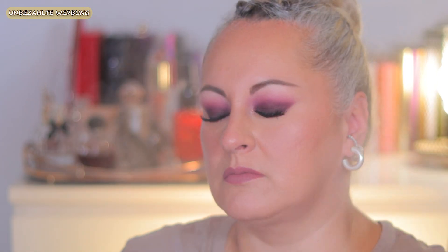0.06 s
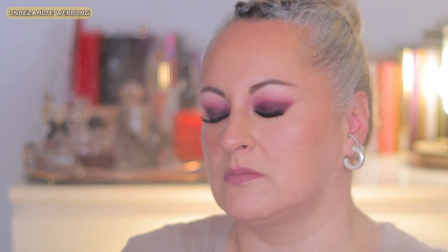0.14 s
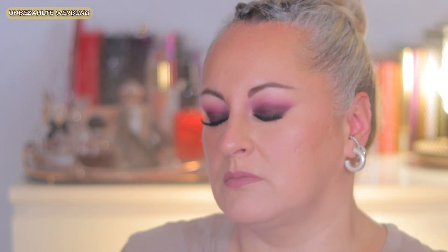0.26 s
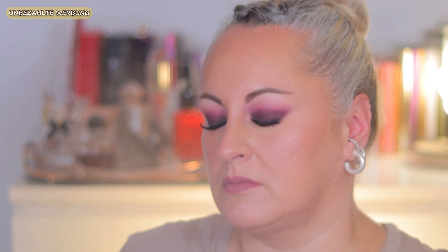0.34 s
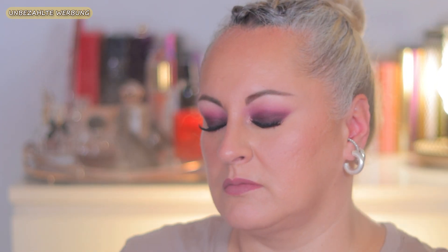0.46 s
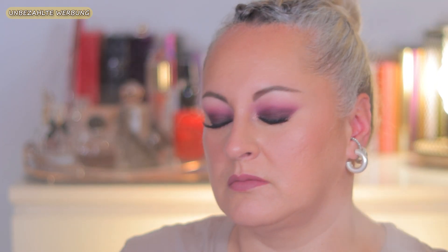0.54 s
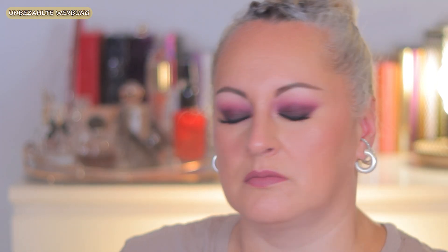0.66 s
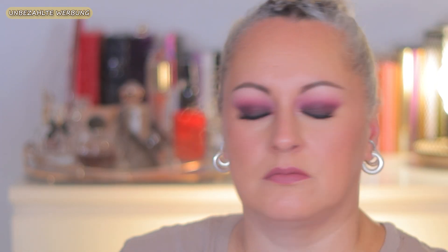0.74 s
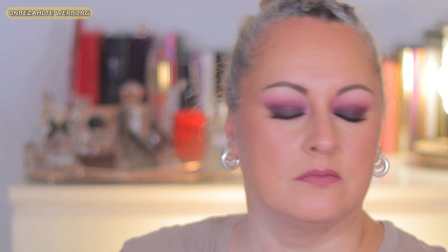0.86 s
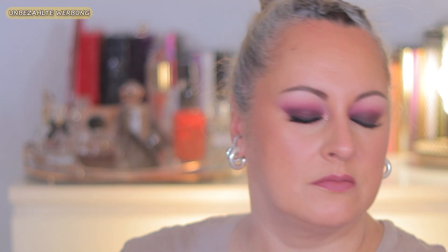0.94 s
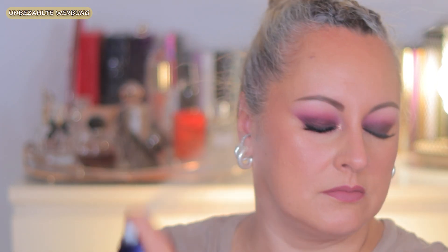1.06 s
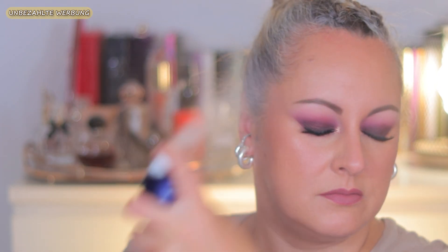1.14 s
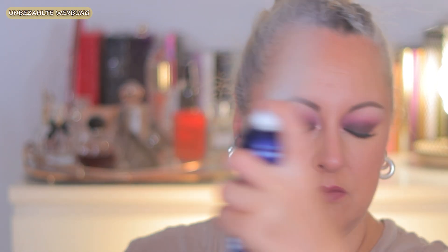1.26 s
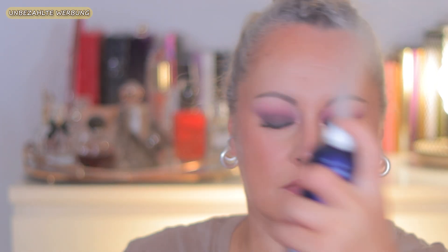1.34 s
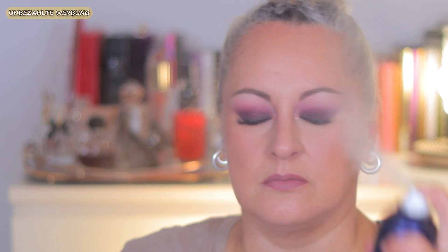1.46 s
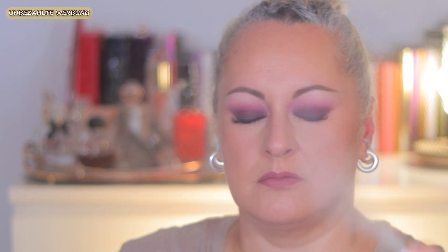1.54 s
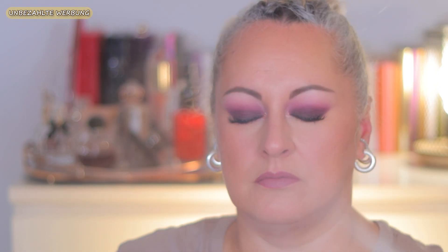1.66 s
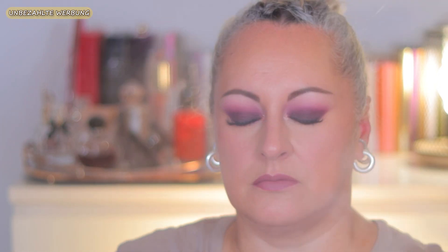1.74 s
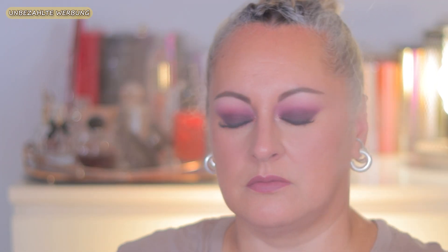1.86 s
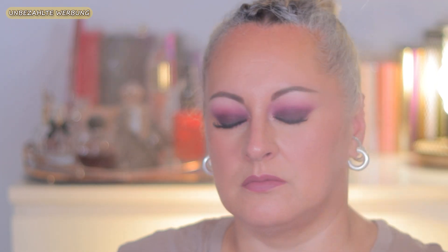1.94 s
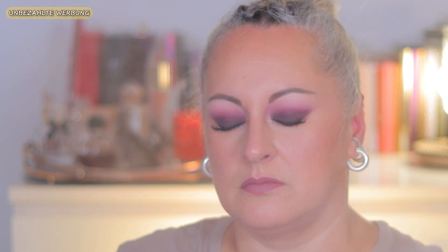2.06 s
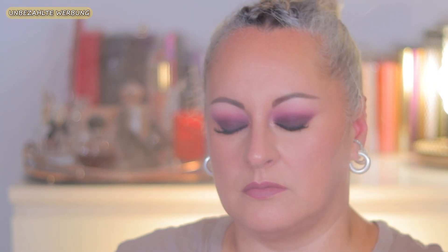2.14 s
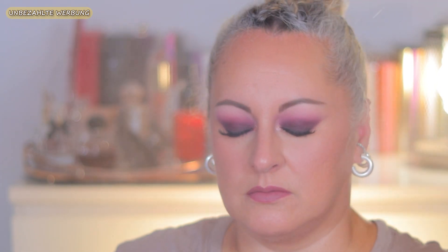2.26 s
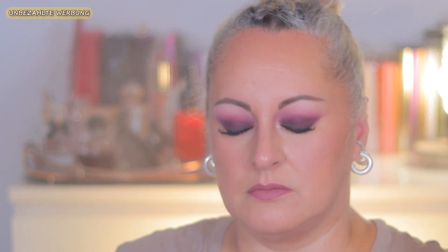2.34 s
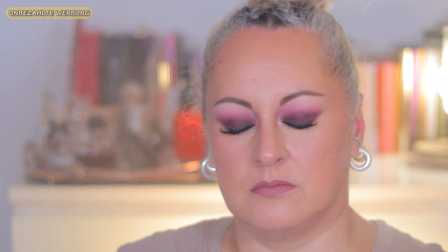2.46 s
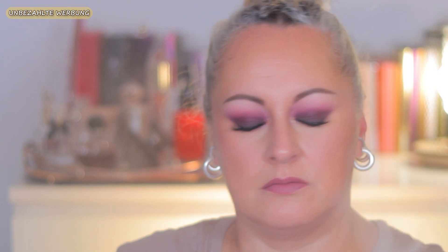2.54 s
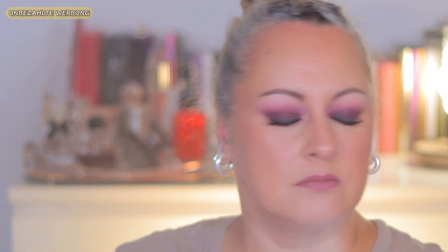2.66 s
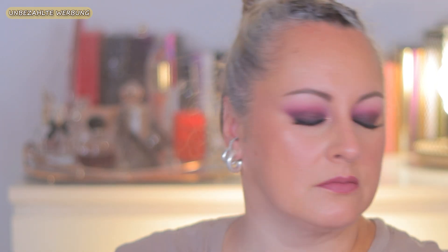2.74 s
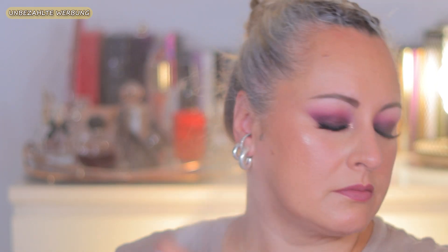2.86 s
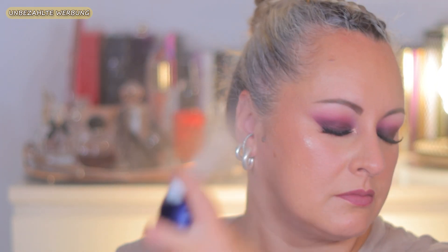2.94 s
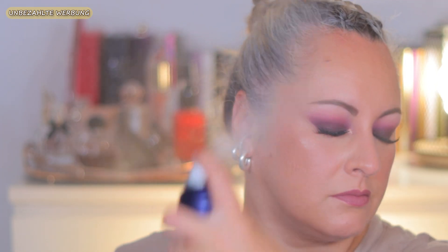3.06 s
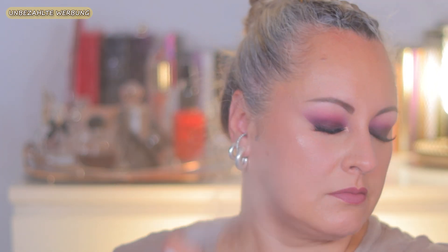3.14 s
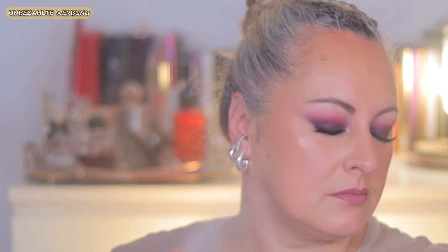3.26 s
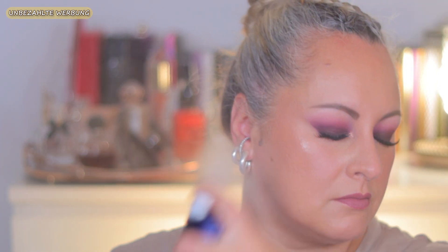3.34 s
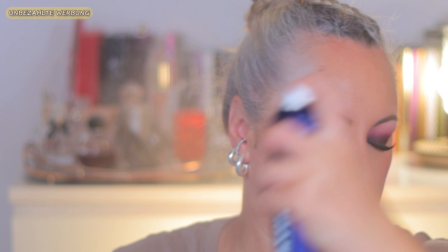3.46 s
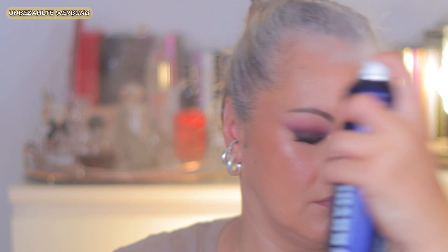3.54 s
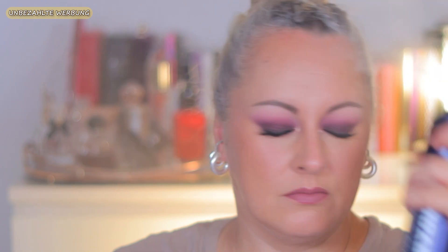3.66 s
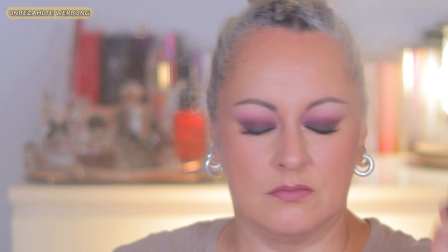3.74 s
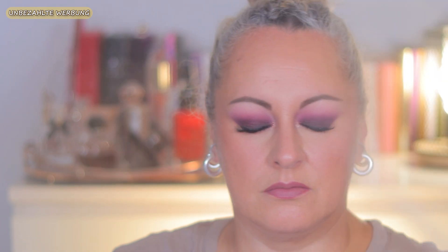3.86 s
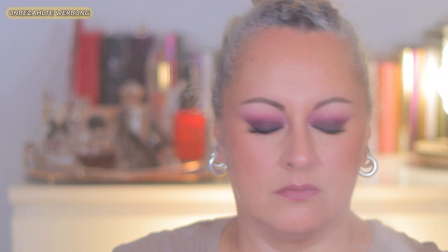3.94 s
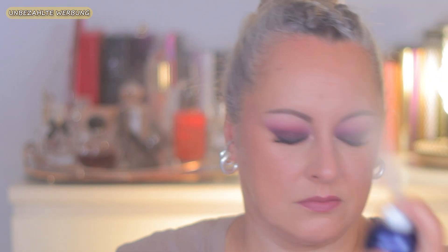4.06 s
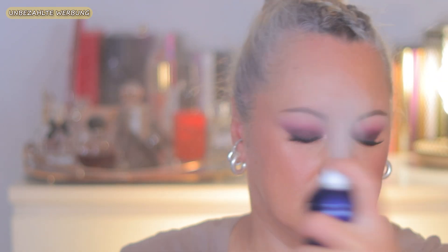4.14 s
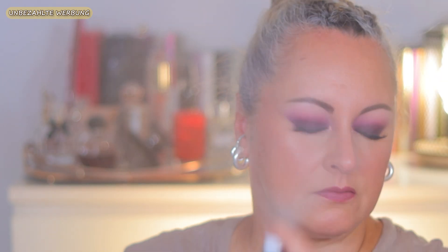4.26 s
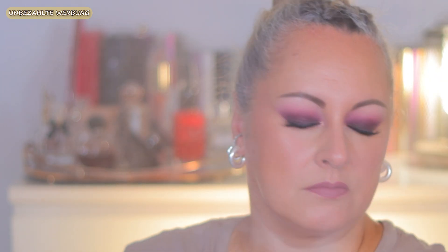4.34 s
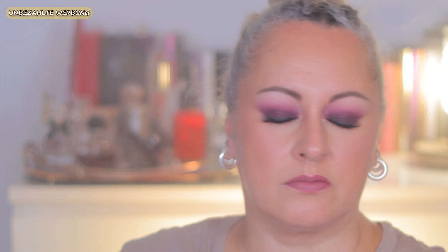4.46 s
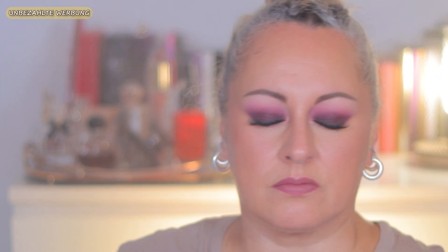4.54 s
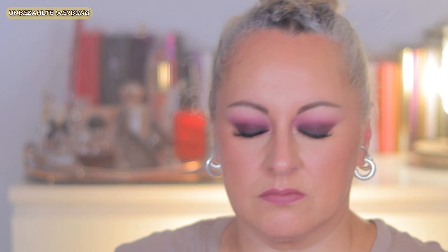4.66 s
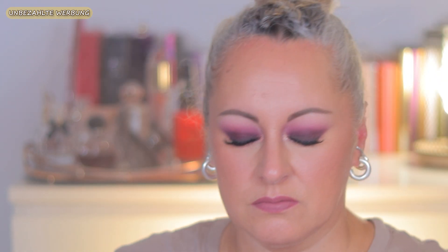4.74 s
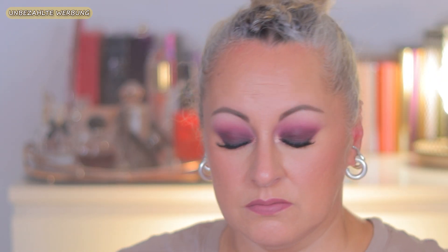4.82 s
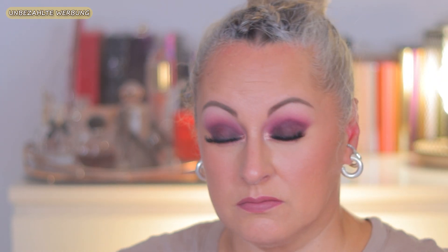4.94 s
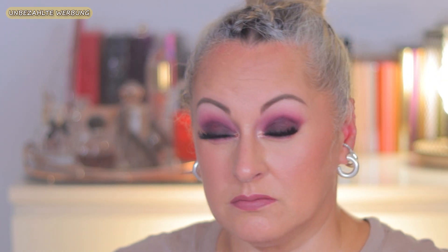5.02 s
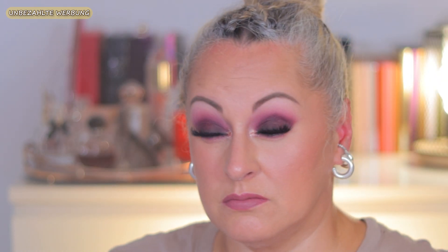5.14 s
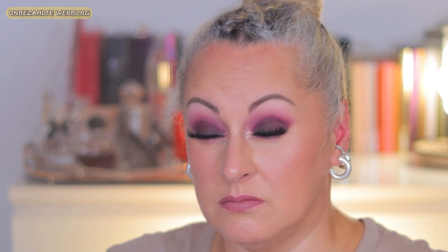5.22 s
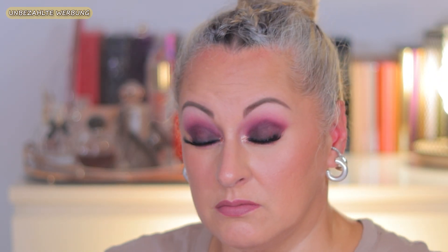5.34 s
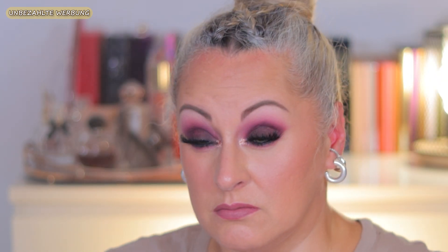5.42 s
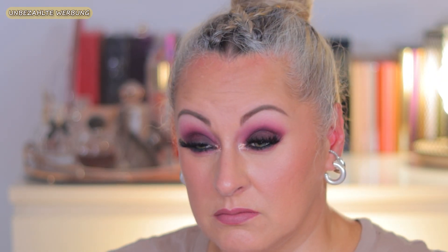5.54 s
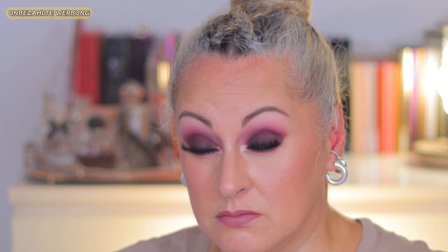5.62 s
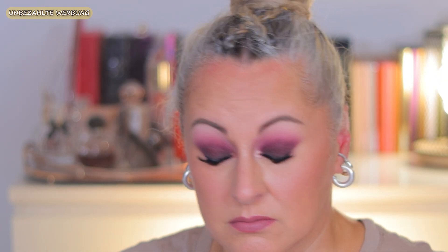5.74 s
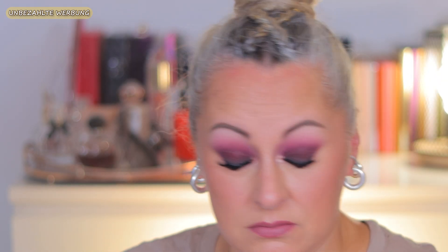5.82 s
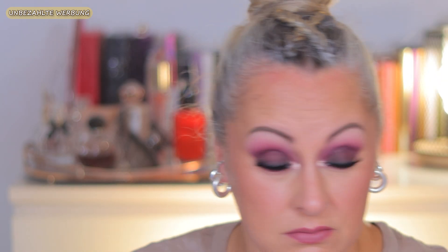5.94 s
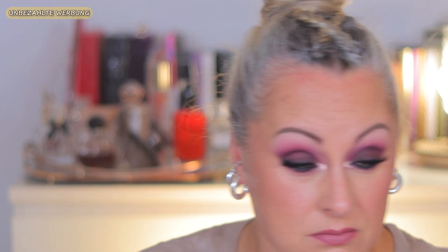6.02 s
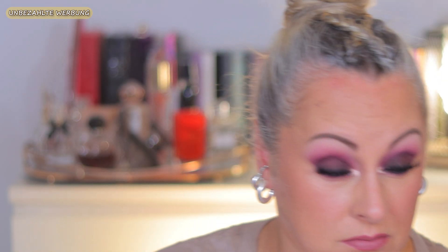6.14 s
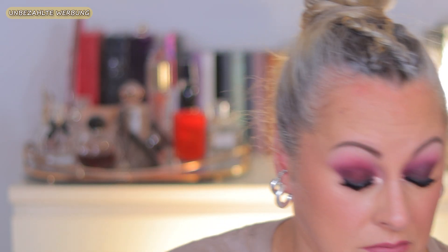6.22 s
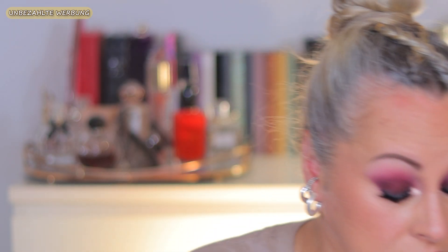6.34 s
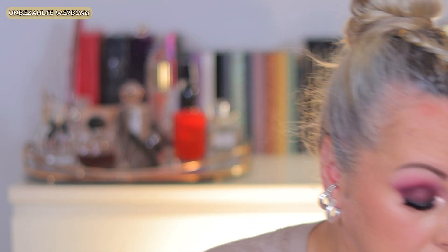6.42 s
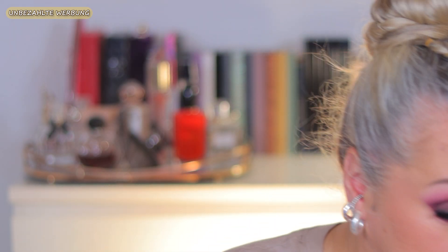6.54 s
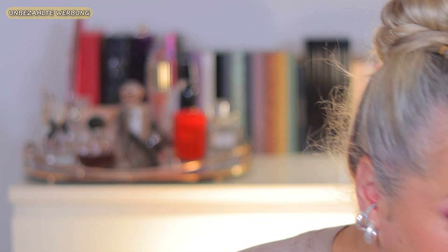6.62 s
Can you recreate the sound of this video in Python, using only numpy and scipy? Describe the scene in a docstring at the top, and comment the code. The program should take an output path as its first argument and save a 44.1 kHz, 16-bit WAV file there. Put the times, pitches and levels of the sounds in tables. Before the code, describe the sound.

A fine mist sprayer hisses continuously for four and a half seconds, swelling as it sweeps past, then a plastic cap snaps on amid air thumps.

```python
"""A spray bottle is swept around a face in a small furnished room, heard by one microphone.
First comes a long hiss of shaped noise that swells as the nozzle passes the microphone, then shuts off.
Next the cap snaps back on: bursts of noise and the ringing of a hollow bottle. Around and after it, fingers
rub the plastic with grainy noise, and near the end a seat creaks as uneven clicks ring wood.
Throughout, stirred air buffets the microphone as deep noise, over a faint mains hum and a quiet hush."""
import sys
import numpy as np
from scipy import signal
from scipy.fft import rfft, irfft
from scipy.io import wavfile
from scipy.ndimage import uniform_filter1d

SR = 44100
rng = np.random.default_rng(int(sys.argv[2]) if len(sys.argv) > 2 else 0)


def waveform_to_disk(signal):
    """Save audio, clipped to [-1, 1], as 16-bit WAV at the path in sys.argv[1]."""
    frames = np.transpose(np.atleast_2d(signal))
    scaled = np.clip(frames, -1, 1) * 32767
    samples = np.round(scaled).astype(np.int16)
    wavfile.write(sys.argv[1], SR, samples)


def undo_db(level):
    """Turn decibels back into plain size, where 20 dB means ten times bigger."""
    steps = np.asarray(level, float) / 20
    return 10 ** steps


N = 294588  # length in samples

# In every spectrum table below, density_db is the relative strength per Hz; only its shape counts.

# sweep of the hand: start_s, level_db, facing_0_to_1 (how squarely the nozzle faces the microphone),
# hump_hz (hump of the fizz), fullness_db (how full the lower jet sounds)
SWEEP = [(0.0, -24.5, 0.16, 8000, -0.5), (0.06, -26.5, 0, 7600, 2.5), (0.29, -24, 0.2, 7750, 1.5),
         (0.45, -26.3, 0.24, 7800, -0.5), (0.58, -26.5, 0.2, 7300, -1.5), (0.7, -24.5, .4, 7500, 2),
         (0.79, -21.5, 1, 7800, 0.5), (0.9, -22.5, 0.7, 7800, -2.5), (1.02, -24.5, 0.6, 7570, -3),
         (1.28, -26, 0.44, 7200, -0.5), (1.58, -25.5, 0.5, 7250, 1), (1.72, -23, .3, 7400, 0.8),
         (1.81, -24, 0.4, 7550, 3), (1.94, -25.5, 0.15, 7900, 0.5), (2.12, -26, 0.26, 7700, 1),
         (2.27, -26, 0.35, 8200, -1), (2.46, -26.5, 0.3, 7650, -4), (2.6, -25.5, .4, 7400, 0.7),
         (2.77, -22.5, .7, 8700, 0.5), (2.86, -23.5, 0.4, 7400, -1.5), (3.04, -26, 0.24, 7000, 1),
         (3.25, -26, 0.35, 7350, -0.3), (3.44, -25.5, 0.67, 7000, -1.4), (3.64, -26.5, .2, 7200, 0.2),
         (3.86, -27.5, 0.2, 7900, 0.3), (4.02, -24.5, 0.4, 7800, 0.5), (4.26, -23, 0.04, 7200, 1.5),
         (4.4, -26, 0.5, 6860, -1.7), (4.52, -22.5, .4, 7650, -0.5)]
# spectrum of the broad fizz: pitch_hz, density_db
FIZZ_SPECTRUM = [(2800, -33), (3700, -13), (4000, -7), (5000, -4.5), (6900, 0.5), (9000, -2), (11200, -1),
                 (14000, -6.5), (16000, -13)]
# spectrum of the lower roar of the jet: pitch_hz, density_db
ROAR_SPECTRUM = [(500, -9), (750, -2.5), (880, -3.5), (1200, 1.5), (1380, -4), (1620, 5.5), (1830, -5.5),
                 (2000, -29)]
# narrow parts of the jet: start_pitch_hz, width_hz, start_level_db (against the fizz), sag_db_per_s,
# climb_share (share of the nozzle tone's climb)
NOZZLE_TONES = [(2480, 170, -15.5, -1.04, 1.0), (2090, 140, -19, -2.2, 0.15), (3350, 400, -18, -2.4, 0.3)]
# mist strikes the face with a low puff: peak_s, level_db (against the fizz), half_width_s
FACE_PUFFS = [(0.28, -36, 0.07), (0.76, -39, 0.076), (1.81, -42.5, 0.079), (2.76, -32, 0.064),
              (3.03, -36.5, .05), (4.27, -40, 0.19)]
# knocks on the plastic: start_s, tick_db, wall_db, upper_modes_db, lower_modes_db
PLASTIC_KNOCKS = [(4.607, -37, -54, -73, -58), (4.984, -26, -33, -24.5, -26),
                  (4.9923, -10.5, -18.5, -20.5, -15.5), (4.9973, -24, -20, -18, -28),
                  (5.0044, -25, -12, -21, -36), (5.0088, -17, -21, -42, -19.5),
                  (5.0202, -34, -23, -37, -37), (5.0269, -35, -19, -32, -25),
                  (5.2094, -18.5, -41.5, -48, -39.5), (5.2099, -38, -39, -50, -48),
                  (5.2172, -33, -37, -55, -59), (5.2214, -34, -29, -46, -40), (5.233, -38, -36, -46, -40),
                  (5.4594, -25.5, -56, -60, -50), (5.4617, -31, -52, -51, -41),
                  (5.4728, -32, -54, -46, -41), (5.648, -46, -54, -63, -65), (5.808, -48, -52, -70, -62),
                  (6.1944, -55, -60, -48, -49)]
# spectrum of the cap's bright crack: pitch_hz, density_db
CRACK_SPECTRUM = [(2500, -10.5), (3900, -16), (4900, -4), (6500, -2), (7100, 1), (7500, -1), (7900, -5),
                  (8500, -5), (10500, -18), (13200, -20), (16000, -36)]
# spectrum of the wall's clack: pitch_hz, density_db
CLACK_SPECTRUM = [(700, -5), (1200, 0), (1550, 3), (1900, 1), (2400, 1), (3000, -2.5), (3800, -6),
                  (5500, -18.5)]
# ringing modes of the hollow bottle: pitch_hz, level_db (against the knock), t60_s (time to fall 60 dB)
BOTTLE_MODES = [(290, -12, .08), (330, -6, .09), (385, 0, .07), (480, -2, .09), (557, -4, .06),
                (800, -3, .08), (928, 3, .085), (1090, -2, .065)]
# fingers slide on the plastic: start_s, length_s, level_db, dull_db (dull part against the bright)
FINGER_SLIDES = [(4.797, 0.091, -66, -10), (5.117, 0.12, -63, 2), (5.416, 0.067, -55, -4),
                 (5.454, 0.056, -39.5, 0), (5.636, .09, -61, -2), (5.786, 0.051, -63, 4),
                 (5.858, 0.099, -63, -15), (6.152, 0.05, -66, 4), (6.31, .04, -68, 5),
                 (6.568, 0.035, -65, 2)]
# spectrum of the bright rustle: pitch_hz, density_db
RUSTLE_SPECTRUM = [(2060, -20), (3500, -7), (4280, -5.5), (5460, -4), (5910, -5), (6800, 0), (15000, -34)]
# spectrum of the duller rub: pitch_hz, density_db
DULL_SPECTRUM = [(180, -12), (300, 4.5), (420, -12), (700, -12), (1700, -21), (2300, -9), (2600, -5),
                 (2900, -12), (3600, -19), (4700, -40)]
# the seat gives: start_s, length_s, level_db, first_pitch_hz, last_pitch_hz
SEAT_CREAKS = [(6.188, .055, -44, 560, 740), (6.24, .08, -49, 790, 800), (6.31, .055, -50, 800, 900),
               (6.575, .06, -59, 570, 400)]
# stirred air reaches the microphone: peak_s, level_db, half_width_s
AIR_GUSTS = [(0.0, -30, 0.047), (0.15, -26.5, 0.021), (0.37, -34, 0.064), (0.54, -28.5, 0.024),
             (0.69, -23, 0.039), (0.96, -21, 0.077), (1.15, -21.5, 0.038), (1.3, -37, 0.066),
             (1.97, -33, 0.05), (2.15, -13.5, 0.034), (2.42, -27.5, 0.12), (3.0, -29, 0.062),
             (3.23, -16.5, 0.061), (3.36, -23.5, 0.041), (3.73, -39.5, 0.087), (4.08, -20, 0.038),
             (4.22, -30, 0.019), (4.72, -22, 0.033), (4.94, -25.5, .06), (5.26, -33, 0.077),
             (5.4, -28, 0.029), (5.53, -37, 0.083), (5.9, -23.5, 0.071), (6.22, -32, 0.051),
             (6.4, -27, 0.065), (6.63, -35, 0.075)]
# spectrum of the stirred air: pitch_hz, density_db
GUST_SPECTRUM = [(3, 0.5), (6, 7), (20, -2), (31, -29), (60, -38.5), (110, -44.5), (200, -86)]
# mains hum: pitch_hz, rms_db
MAINS_HUM = [(99.6, -75.5), (199.2, -68.5)]
# spectrum of the room hush: pitch_hz, density_db
HUSH_SPECTRUM = [(20, 1.5), (40, 7), (60, 2), (110, -3), (160, -8.5), (250, -7), (600, -11.5), (1100, -17),
                 (1500, -19.5), (3000, -24), (11800, -27.5), (12300, -22), (16000, -23)]
# how fast the room's reflections die: pitch_hz, t60_s (time to fall 60 dB)
ROOM_DECAY = [(250, 0.28), (660, 0.18), (1740, 0.23), (4590, 0.21), (12100, 0.18)]


def evened(x):
    """Scales to rms 1."""
    return x / np.sqrt(np.mean(x ** 2) + 1e-20)


def read(points, hz):
    """Reads a table of values between its points, on a log-frequency axis."""
    f, value = np.transpose(points)
    return np.interp(np.log(hz + 1), np.log(f + 1), value)


def coloured(points, size=N):
    """Steady noise of a given spectrum, rms 1."""
    hz = np.fft.rfftfreq(size, 1 / SR)
    white = rfft(rng.standard_normal(size))
    return evened(irfft(white * undo_db(read(points, hz)), size))


def resonate(x, hz, width_hz):
    """A resonance of gain 1 that follows the curve hz: shift down to zero, smooth, shift back up."""
    turn = np.exp(2j * np.pi * np.cumsum(hz * np.ones(len(x))) / SR)
    r = np.exp(-np.pi * width_hz / SR)
    return 2 * (turn * signal.lfilter([1 - r], [1, -r], x / turn)).real


def wander(t, per_s, count):
    """Slow random drifts, rms 1: sums of slow sines, the slower the stronger."""
    rate = np.geomspace(per_s / 10, per_s, 20)[:, None]
    phase = rng.random((count, 20, 1))
    return evened((np.sin(2 * np.pi * (rate * t + phase)) / np.sqrt(rate)).sum(1))


def rub(t, start, length):
    """Progress 0-1 through a rub, and its swell: up to an early peak, down again."""
    peak_at, skirt_db = 0.37, -16.5  # peak as a share of the length; level at both ends
    u = (t - start) / length
    away = np.maximum((peak_at - u) / peak_at, (u - peak_at) / (1 - peak_at))
    return np.clip(u, 0, 1), undo_db(np.maximum(skirt_db * away ** 2, -200))


def bumps(rows, t):
    """Sum of bell-shaped swells."""
    return sum(undo_db(db) * np.exp(-.5 * ((t - s) / half) ** 2) for s, db, half in rows)


def background():
    """Slow air pressure on the microphone as deep noise, room hush as steady noise, mains hum as sines."""
    calm_db, hush_db = -47.5, -55
    t = np.arange(N) / SR
    air = coloured(GUST_SPECTRUM)
    # level out chance swells, so that the strength of a gust is set by its row alone
    air = evened(air / np.sqrt(uniform_filter1d(air ** 2, 5000) + 0.22))
    strength = undo_db(calm_db) + bumps(AIR_GUSTS, t)
    hum = sum(np.sqrt(2) * undo_db(db) * np.sin(2 * np.pi * (hz * t + rng.random())) for hz, db in MAINS_HUM)
    return strength * air + hum + undo_db(hush_db) * coloured(HUSH_SPECTRUM)


def creaks(slips_per_s=390.0):
    """Uneven stick-slip clicks ring a wooden resonance that drifts, and a fixed one above it."""
    t, out = np.arange(N) / SR, np.zeros(N)
    slips = (rng.random(N) < slips_per_s / SR) * rng.choice([-1., 1.], N)
    upper = evened(resonate(resonate(slips, 880, 150), 910, 250))
    for s, length, db, from_hz, to_hz in SEAT_CREAKS:
        progress, swell = rub(t, s, length)
        hz = from_hz + (to_hz - from_hz) * progress
        drifting = evened(resonate(resonate(slips, hz, 98), hz, 200))
        out += undo_db(db) * swell * evened(drifting + .5 * upper)
    return out


def slides():
    """Skin on plastic: a grainy bright rustle and a duller rub that peaks later."""
    t = np.arange(N) / SR
    bright, dull = np.zeros(N), np.zeros(N)
    for s, length, db, dull_db in FINGER_SLIDES:
        bright += undo_db(db) * rub(t, s, length)[1]
        dull += undo_db(db + dull_db) * rub(t, s + 0.31 * length, length)[1]
    roughness = evened(uniform_filter1d(rng.standard_normal(N), 90))
    grain = evened(undo_db(2.6 * roughness))
    return grain * (bright * coloured(RUSTLE_SPECTRUM) + dull * coloured(DULL_SPECTRUM))


def knocks(crack_t60_s=0.0099, clack_t60_s=0.027):
    """Each knock: a bright crack and a noisy clack, too damped to ring, and the hollow bottle's modes."""
    size = 4096
    out, t = np.zeros(N + size), np.arange(size) / SR
    hz, db, t60 = np.transpose(BOTTLE_MODES)[:, :, None]
    for s, tick_db, wall_db, upper_db, lower_db in PLASTIC_KNOCKS:
        # both noises start with a very short rise
        crack = undo_db(tick_db - 60 * t / crack_t60_s) * coloured(CRACK_SPECTRUM, size)
        crack = crack * np.minimum(t / 0.00062, 1)
        clack = undo_db(wall_db - 60 * t / clack_t60_s) * coloured(CLACK_SPECTRUM, size)
        clack = clack * np.minimum(t / 0.00097, 1)
        uneven_db = 1.5 * rng.standard_normal(hz.shape)  # no two knocks ring the modes alike
        blow_db = np.where(hz > 680, upper_db, lower_db)
        ring = undo_db(db + blow_db + uneven_db - 60 * t / t60) * np.sin(2 * np.pi * hz * t)
        soft = np.minimum(t * hz / 1.4, 1)  # the hollow takes a cycle or two to speak
        out[round(s * SR):][:size] += crack + clack + (ring * soft).sum(0)
    return out[:N]


def unit(gains):
    """Scales a spectrum to a total power of 1."""
    return gains / np.sqrt((gains ** 2).sum(0))


def bell(hz, centre_hz, width_hz):
    """A bell-shaped curve over frequency."""
    return np.exp(-.5 * ((hz - centre_hz) / width_hz) ** 2)


def jet(patchy_db=1.5, flicker_db=0.34, waver_db=1.05, waver_hz=22):
    """Turbulent mist: broad fizz with a moving hump, nozzle tones, a roar and a low puff, all patchy."""
    shut_s, shut_db_per_s = 4.51, -380  # the valve closes
    rise_hz, rise_s = 230, 2.2  # the nozzle tone climbs and settles as the pressure drops
    roar_db, roar_sag_db_per_s = -27, -0.26
    hump_db, top_db = 5, -2  # facing the microphone lifts a hump in the fizz and tilts its top
    puff_hz, puff_width_hz, puff_rest_db = 570, 120, -40.5
    frames, hz = N // 256 + 5, np.fft.rfftfreq(1024, 1 / SR)[:, None]
    t = np.arange(frames) * 256 / SR
    s, sweep_db, *controls = np.transpose(SWEEP)
    facing, hump_hz, full_db = (np.interp(t, s, c) for c in controls)
    drift = wander(t, 8., count=5)

    hump = facing * hump_db * bell(hz, hump_hz, 1240)
    top = (2.5 + top_db * facing) * bell(hz, 10600, 1400)
    fizz = unit(undo_db(read(FIZZ_SPECTRUM, hz) + hump + top))
    roar_level = undo_db(roar_db + roar_sag_db_per_s * t + full_db + waver_db * drift[3])
    roar = roar_level * unit(undo_db(read(ROAR_SPECTRUM, hz)))
    puff = (undo_db(puff_rest_db) + bumps(FACE_PUFFS, t)) * unit(bell(hz, puff_hz, puff_width_hz))
    power = fizz ** 2 + roar ** 2 + puff ** 2
    climb_hz = rise_hz * (1 - np.exp(-t / rise_s)) + waver_hz * drift[4]
    for k, (start_hz, width_hz, db, sag_db, share) in enumerate(NOZZLE_TONES):
        level = undo_db(db + sag_db * t + full_db + waver_db * drift[k])
        power = power + (level * unit(bell(hz, start_hz + share * climb_hz, width_hz))) ** 2

    # random noise frames, shaped by the spectrum; patches spread over time and pitch, flicker over time
    a, b, patches = rng.standard_normal((frames, 513, 3)).T
    patches = evened(uniform_filter1d(uniform_filter1d(patches, 8, 0), 6, 1))
    shape = np.sqrt(power) * undo_db(patchy_db * patches + flicker_db * rng.standard_normal(frames))
    mist = evened(signal.istft((a + 1j * b) * shape, nperseg=1024, noverlap=768)[1][:N])
    t = np.arange(N) / SR
    return mist * undo_db(np.interp(t, s, sweep_db) + shut_db_per_s * np.maximum(t - shut_s, 0))


def room(x, shifts_per_s=7.):
    """Sparse reflections, each band dying at its own speed; the pattern shifts as the hand moves about."""
    room_db = -6.5
    # three patterns of single echoes, one at a random place in every 20 samples
    taps, at = np.zeros((3, SR // 2)), np.arange(130, SR // 2 - 20, 20)
    places = at + rng.integers(0, 20, (3, len(at)))
    np.put_along_axis(taps, places, rng.choice([-1., 1.], (3, len(at))), 1)
    hz, t, z = signal.stft(taps, SR, nperseg=256)
    tails = signal.istft(z * undo_db(-60 * t / read(ROOM_DECAY, hz)[:, None]), SR, nperseg=256)[1]
    # the sound is passed around the three patterns at a steady total power
    turn = 2 * np.pi * (shifts_per_s * np.arange(N) / SR / 2 + np.arange(3)[:, None] / 3)
    fed = x * np.sqrt(2 / 3) * np.cos(turn)
    echoes = signal.oaconvolve(fed, tails / np.linalg.norm(tails[0]), axes=1)[:, :N]
    return undo_db(room_db) * echoes.sum(0)


def scene():
    """All sources in the room, the same on both channels; the seat is close and nearly dry."""
    seat = creaks()
    hand = slides() + knocks() + jet()
    mix = background() + seat + hand + room(hand + 0.5 * seat)
    return np.tile(mix, (2, 1))


def low_pass(x):
    """Removes everything above the highest recorded frequency."""
    return signal.sosfilt(signal.butter(12, 17060, fs=SR, output="sos"), x)


def record(dry):
    """A steep low-pass filter takes away the highest treble."""
    edge = signal.firwin(1023, 15760, window=("kaiser", 9), fs=SR)  # edge in Hz
    mix = signal.oaconvolve(dry, edge[None], "same")
    return low_pass(mix)


dry = scene()
out = record(dry)
waveform_to_disk(out)
```